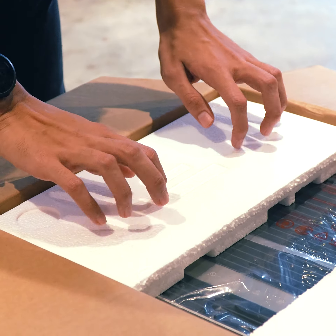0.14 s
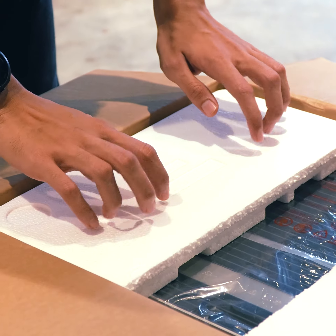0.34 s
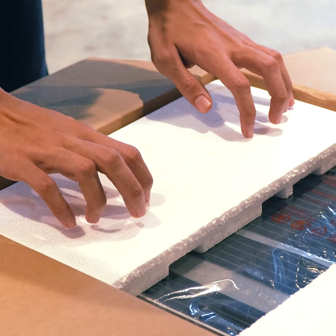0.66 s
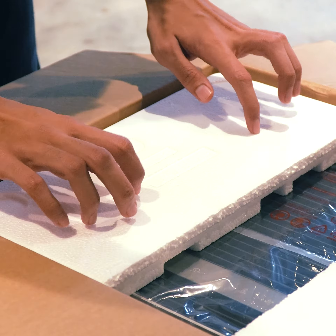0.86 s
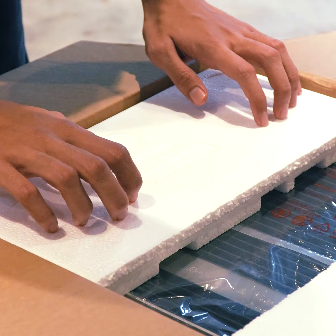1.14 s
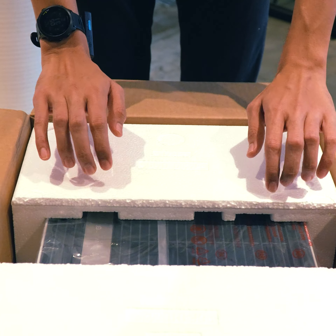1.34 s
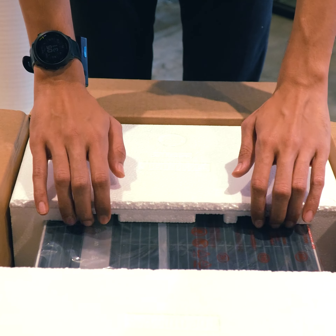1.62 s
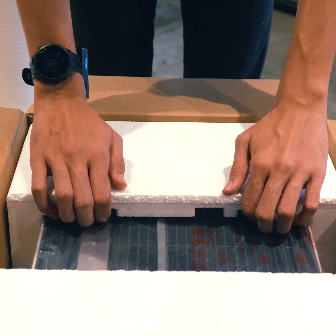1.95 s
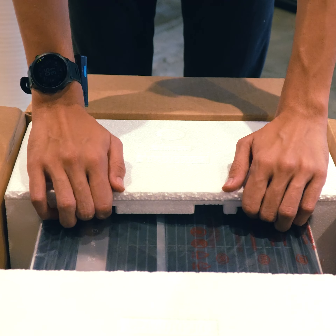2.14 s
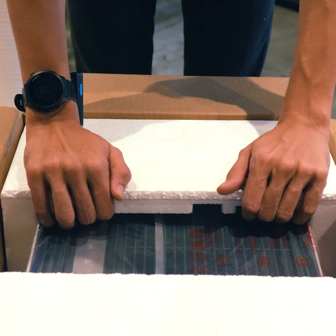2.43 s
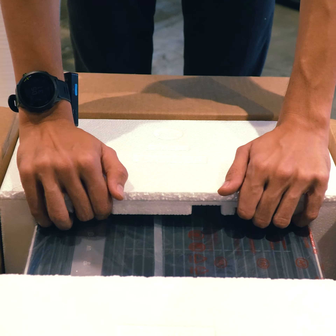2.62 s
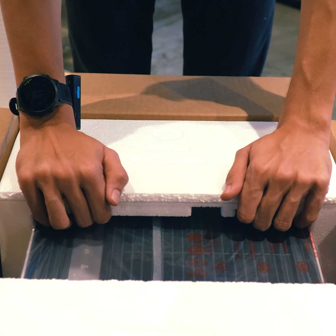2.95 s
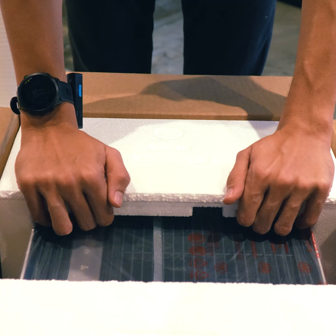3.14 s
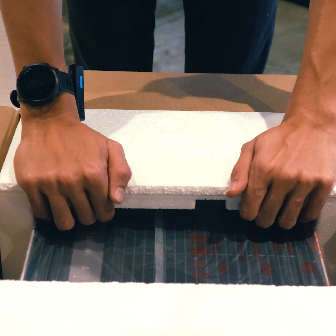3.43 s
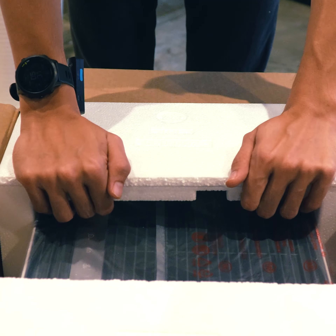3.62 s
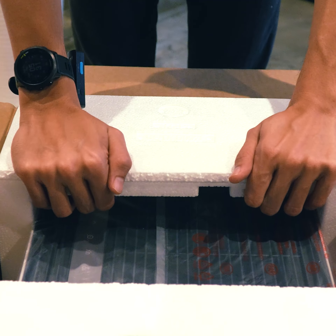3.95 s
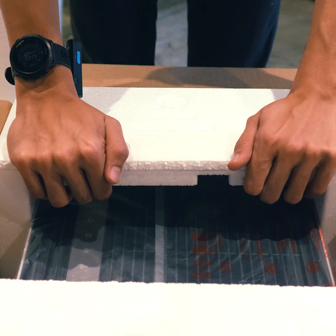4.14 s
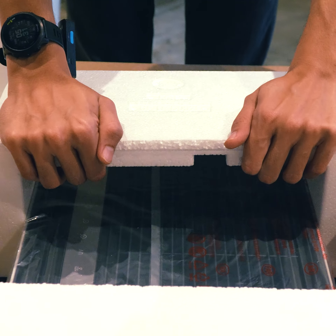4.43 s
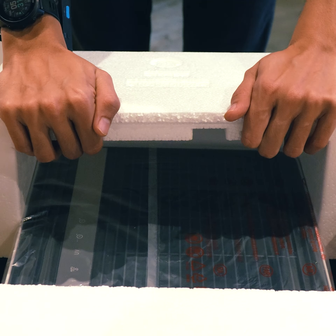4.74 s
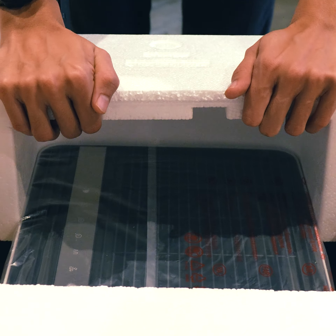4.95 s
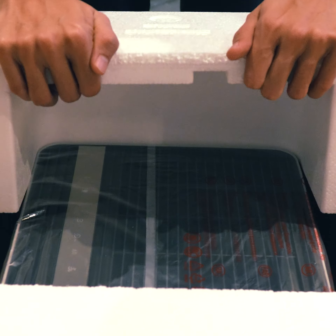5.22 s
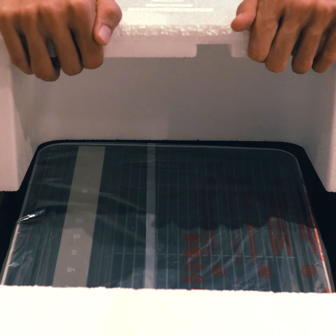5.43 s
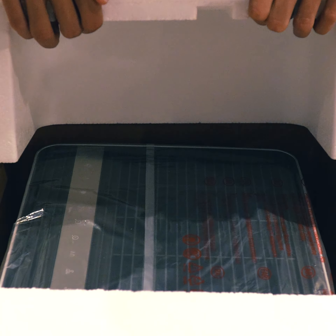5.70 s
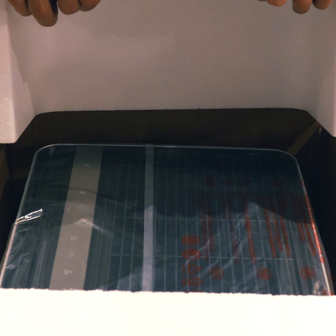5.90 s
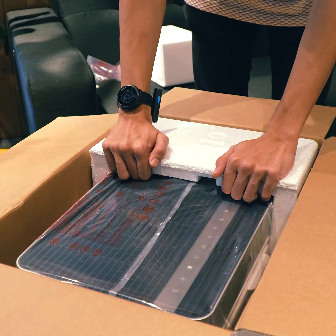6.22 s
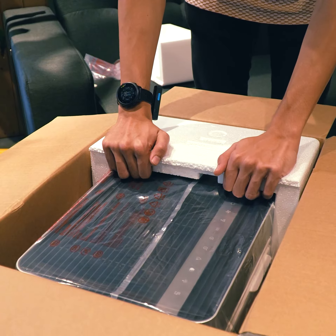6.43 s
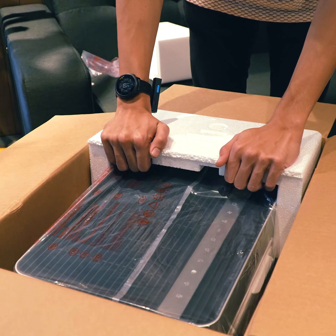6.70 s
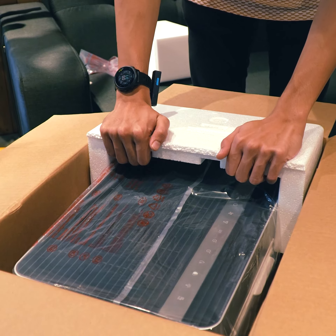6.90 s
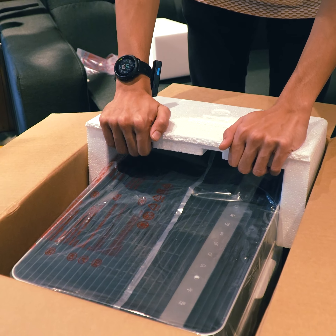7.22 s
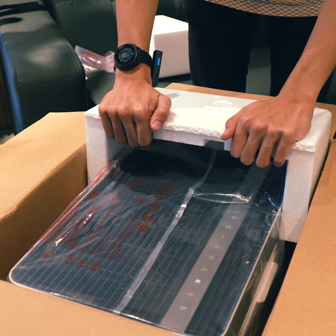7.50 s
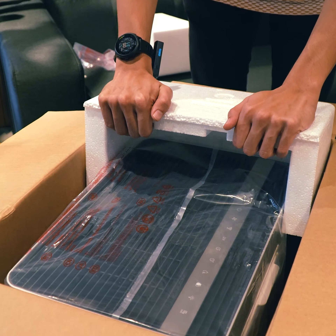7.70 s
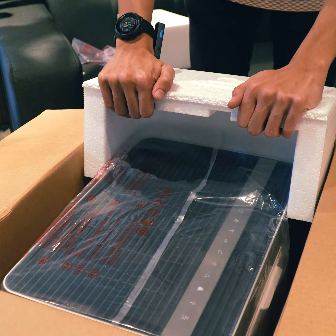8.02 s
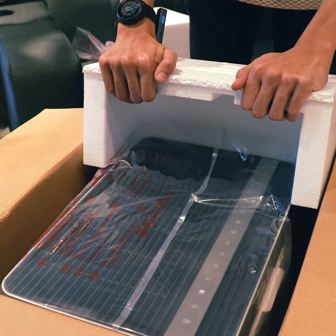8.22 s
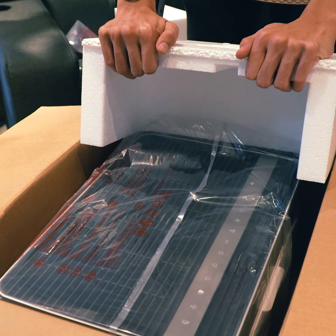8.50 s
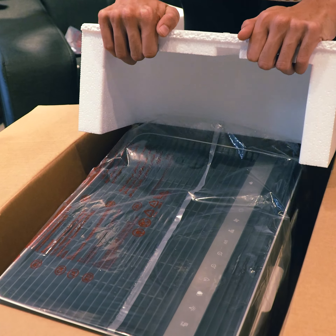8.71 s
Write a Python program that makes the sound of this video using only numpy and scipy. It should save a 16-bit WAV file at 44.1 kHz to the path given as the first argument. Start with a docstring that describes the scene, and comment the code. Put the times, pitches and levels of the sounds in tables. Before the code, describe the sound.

Close, dry indoor sound with a short room echo over very faint air. From 0.1 to 1.1 s, fingertips drum on a polystyrene slab in uneven clusters: low hollow thuds, light nail ticks, tiny brushes. Around 1.2-1.6 s come soft dull knocks, then skin rubs brightly over the foam until about 2.5 s, with creaks, sharp bead ticks and a stronger cluster of bumps near 2.3 s. Crackles patter at 2.8-2.9 s; creaks tighten at 3.1-3.3 s into short jerky scrapes. From 4.1 to 6.1 s one long raspy hiss slides up cardboard, growing hollower from about 4.4 s, with light plastic rustle and a short groan near 4.9 s. At 6.3-6.7 s come small creaks and knocks, then a second gritty, juddering pull to the end, with a bump at 7.5, a sharp tick at 7.8, a fresh surge at 8 and thin high squeaks around 8.6.

```python
"""Foam insert handled in a box

Fingers drum on a polystyrene insert, slide over its edge and grip it, close by and indoors: damped swings,
modal rings and bursts of noise. The foam creaks, then scrapes up its cardboard box in jerks and long pulls,
and a second insert follows: random bead slips, filtered into registers. Knocks and soft presses bump dully
as damped swings with low noise; beads and plastic wrap crackle as short bursts and clumped impulses."""
import sys
import numpy as np
from scipy import signal
from scipy.fft import rfft, irfft, next_fast_len
from scipy.io import wavfile
from scipy.ndimage import uniform_filter1d

SR = 44100
rng = np.random.default_rng(int(sys.argv[2]) if len(sys.argv) > 2 else 0)


def to_wav(s):
    """Save 16-bit WAV."""
    ch = np.atleast_2d(s).T  # columns
    pcm = np.round(np.clip(ch, -1, 1) * 32767)  # PCM
    wavfile.write(sys.argv[1], SR, pcm.astype(np.int16))


N = 390726
TIME = np.arange(N) / SR

# Levels in event tables are relative; the sources trim them.
# Finger taps. Each row: time in seconds, thud in dB, nominal thud pitch in Hz, nail tick in dB,
# slab ring in dB re the thud column.
FINGER_TAPS = [(0.121, -8, 286, -32, -15.5), (0.124, -4.5, 167, -21.5, -9), (0.164, -20, 178, -44, -27),
               (0.295, -9.5, 160, -22, -26), (0.306, -3, 181, -33, -14), (0.346, -14, 181, -30.5, -16),
               (0.465, -10, 248, -22.5, -3), (0.469, -8, 220, -34, -14), (0.534, -9.5, 168, -26, -18),
               (0.545, -9.5, 206, -32, -17), (0.628, -9, 198, -27, -18), (0.633, -10, 141, -26, -6.5),
               (0.642, -10.5, 242, -29.5, 0.5), (0.767, -5, 245, -34.5, -12.5), (0.842, -16, 207, -39, -24),
               (0.855, -11.5, 188, -37, -15.5), (0.899, -12.5, 183, -31, -18),
               (0.976, -2.5, 234, -26.5, -10), (1.002, -10.5, 284, -29, -8.5), (1.004, -3, 204, -32, -12),
               (1.093, -10, 207, -31.5, -19.5)]
# Dull knocks of the insert on the box and soft finger presses. Each row: time in seconds, level in dB,
# pitch in Hz.
KNOCKS_AND_PRESSES = [(1.224, -16, 91), (1.447, -9, 154), (1.529, -8.5, 117), (1.637, -20, 88),
                      (1.954, -18.5, 121), (2.112, -25, 109), (2.21, -25, 110), (2.3, -5.5, 159),
                      (2.323, -10, 237), (2.406, -11, 240), (2.394, -9, 130), (2.424, -12, 113),
                      (2.599, -35, 120), (3.002, -28.5, 99), (3.68, -32, 70), (3.87, -35.5, 70),
                      (5.61, -36, 80), (6.063, -26.5, 72.7), (6.38, -26, 170), (6.43, -28, 170),
                      (6.508, -18, 100), (6.534, -11.5, 158), (6.6, -23, 130), (6.669, -18, 136),
                      (7.019, -30, 110), (7.081, -24.5, 114), (7.135, -32, 150), (7.253, -28, 161),
                      (7.42, -19, 133), (7.5, -10, 203), (7.766, -19.5, 159), (8.57, -35, 69.5)]
# Single slips of gripped foam. Each row: time in seconds, slab body in dB, snap in dB.
FOAM_SLIPS = [(1.95, -21, -27), (2.042, -20, -19), (2.06, -20, -22), (2.339, -16, -19), (2.372, -12, -34),
              (2.388, -11, -24), (2.403, -8.5, -25), (2.537, -20, -28), (2.601, -22, -25),
              (2.985, -25, -25), (3.145, -24, -27), (3.16, -12, -26.5), (3.173, -22, -38),
              (3.185, -23, -35), (3.201, -14.5, -31), (3.222, -12, -20), (3.239, -8, -37),
              (3.28, -12, -22.5), (3.325, -12.5, -19), (4.075, -30, -28), (4.875, -25, -30),
              (4.915, -28, -38), (6.287, -22.5, -31), (6.314, -27, -39), (6.351, -29, -30),
              (6.373, -24, -24)]
# Sharp ticks of beads and plastic wrap. Each row: time in seconds, level in dB.
BEAD_TICKS = [(0.2287, -11.5), (0.42, -20), (1.7384, -25), (2.009, -7), (2.186, -8), (2.513, -8.5),
              (2.7674, -14), (2.7831, -15.5), (2.809, -12), (2.846, -9.5), (2.861, -8), (2.886, -9),
              (2.9038, -11), (6.282, -21.5), (7.833, -6.5)]
# Skin strokes on foam. Each row: start in seconds, length before release in seconds, rub in dB,
# slab body in dB re the rub column.
SKIN_RUBS = [(0.148, 0.1, -34, -6.5), (0.344, 0.039, -27, -10), (0.53, 0.042, -32.5, 0),
             (0.649, 0.07, -41.5, -3), (0.783, 0.015, -42, -8), (0.835, 0.03, -33, -21),
             (0.884, 0.02, -32.5, 6), (1.003, 0.07, -50, 7), (1.09, 0.042, -35.5, -17),
             (1.14, 0.06, -64, -2), (1.275, 0.04, -59, -6), (1.539, 0.04, -38.5, -8),
             (1.565, 0.055, -25.5, -1.5), (1.636, 0.028, -24, -8), (1.647, 0.029, -21.5, -7),
             (1.679, 0.069, -20.5, -2.5), (1.751, 0.095, -27, -8.5), (1.843, 0.058, -26, 2.5),
             (1.88, 0.049, -18, -16), (1.934, 0.13, -22.5, -2), (2.064, 0.22, -24, -11.5),
             (2.269, 0.15, -27, -3), (2.414, 0.052, -28, -10), (2.479, 0.044, -28.5, -2),
             (2.545, 0.096, -29, -19), (2.65, 0.1, -36, -13), (2.769, 0.068, -36, 1),
             (2.851, 0.064, -35.5, -12), (2.95, 0.18, -42, -4.5), (3.142, 0.16, -41, 7),
             (3.311, 0.43, -38.5, 11)]
RUB_ATTACK_S, RUB_RELEASE_S, RUB_SAG_DB_PER_S = 0.031, 0.014, 6.5
# Narrow foam sounds: a faint whisper, a short groan and high squeaks.
# Each row: start in seconds, length in seconds, centre in Hz, width in Hz, level in dB.
NARROW_SOUNDS = [(0.007, 0.21, 4080, 400, -48.5), (4.867, 0.083, 930, 350, -24),
                 (8.534, 0.1, 10800, 500, -29), (8.59, 0.046, 11000, 900, -24),
                 (8.632, 0.037, 11000, 2400, -16.5)]
# Runs of small slips in strained foam. Each row: start in seconds, length before release in seconds,
# level in dB.
FOAM_GROANS = [(1.87, 0.11, -41), (1.94, 0.068, -34.5), (2.26, 0.18, -33.5), (2.48, 0.053, -52),
               (2.58, 0.03, -31.5), (2.97, 0.095, -38.5), (3.07, 0.11, -34.5), (3.14, 0.22, -33.5),
               (3.33, 0.42, -39)]
GROAN_ATTACK_S, GROAN_RELEASE_S, GROAN_SAG_DB_PER_S = 0.032, 0.012, 14
# Jerks up the box wall. Each row: start in seconds, length before release in seconds, hiss in dB.
WALL_JERKS = [(3.315, 0.028, -24), (3.385, 0.087, -22), (3.79, 0.046, -28.5), (3.872, 0.052, -26.5),
              (3.978, 0.045, -23), (6.352, 0.048, -38.5), (6.385, 0.084, -50), (6.44, 0.062, -28.5)]
JERK_ATTACK_S, JERK_RELEASE_S, JERK_RASP_DB = 0.025, 0.0057, 2.5  # rasp re hiss
# Long pulls: a short heave, then one pull per insert. Each row: time in seconds, hiss in dB,
# rasp of a tight fit in dB re hiss.
HEAVE_CURVE = [(3.17, -44, 3), (3.28, -33.5, 7), (3.308, -38, 5), (3.348, -24.5, 5), (3.676, -25, 0.5),
               (3.79, -36.5, -3)]
FIRST_PULL_CURVE = [(4.08, -30, -4), (4.096, -31.5, 2), (4.19, -21, 1), (4.228, -21.5, 1),
                    (4.372, -21.5, -3.5), (4.426, -25, -5), (5.16, -22.5, -5.5), (5.424, -24.5, -2),
                    (5.722, -26.5, 9), (5.74, -22.5, 3.5), (5.948, -24.5, 2.5), (6.06, -18.5, -2)]
SECOND_PULL_CURVE = [(6.51, -38, 4), (6.55, -20, 0), (6.86, -19, 0.5), (7.22, -25.5, 3), (7.73, -25.5, -4),
                     (7.92, -27, 0), (7.96, -19.5, -5.5), (8.07, -23.5, -3), (8.44, -22, -4),
                     (8.53, -27.5, 3.5), (8.63, -24, 1.5), (8.72, -28, 5), (8.86, -26, 2)]
PULL_CURVES = [HEAVE_CURVE, FIRST_PULL_CURVE, SECOND_PULL_CURVE]
# Momentary catches of the sliding foam. Each row: time in seconds, dip in dB.
SLIDE_CATCHES = [(4.408, -4), (4.6, -2.5), (7.07, -6.5), (7.2, -1.5)]
CATCH_S = 0.018
USUAL_HISS_DB = -23.5
BODY_FOLLOW = 0.39  # exponent: slab body, cavity and drag follow the effort
FIZZ_LOSS_DB_PER_DB = 0.21  # fizz lost per dB of rasp over hiss
# The two inserts. Each row: gripped at seconds, cavity starts to open at seconds, fully open at seconds,
# slab body in dB, closed cavity in dB, open cavity in dB.
INSERT_STATES = [(3.0, 4.4, 5.42, -34, -35.5, -24.5), (6.307, 7.95, 8.4, -35.5, -37.5, -25.5)]
# Plastic wrap rustles. Each row: start in seconds, length before release in seconds, level in dB.
WRAP_RUSTLES = [(4.29, 0.09, -32), (4.85, 0.59, -37), (5.96, 0.1, -28), (7.39, 0.34, -42),
                (7.9, 0.62, -36.5)]
RUSTLE_ATTACK_S, RUSTLE_RELEASE_S = 0.054, 0.012

# Spectra of skin on foam, foam on card, flexing box, box-wall drag, air, nail, foam snap, strained slab.
# Each row: frequency in Hz, relative gain in dB.
SKIN_SPECTRUM = [(210, -46), (350, 12), (404, 2.5), (611, -14.5), (955, -2), (1450, -5), (1720, -16.5),
                 (2530, -14.5), (3010, -8), (3760, -15), (4140, -4), (4700, -6), (5520, -6), (9640, -11.5),
                 (15800, -28)]
CARD_SPECTRUM = [(300, -41), (520, -26), (640, -25.5), (800, -16.5), (1050, -11), (1350, -11), (1560, -7),
                 (1950, -7), (2500, -1.5), (3200, 3), (4200, -1.5), (5200, -1.5), (8500, -18), (11000, -24),
                 (15800, -37)]
BOX_SPECTRUM = [(25, -59), (45, -8), (80, 4), (115, 5), (150, -1.5), (185, -3.5), (235, -7.5), (290, -18.5),
                (420, -39), (800, -86)]
DRAG_SPECTRUM = [(25, -28), (50, -1.5), (85, -2), (160, -6), (250, -4), (420, -2), (600, -7), (900, -24.5)]
AIR_SPECTRUM = [(25, -29), (60, -2.5), (220, -3), (380, -4.5), (510, -11), (930, -2), (1270, -8),
                (1830, -15.5), (3500, -22), (6000, -25), (10000, -39), (15000, -48)]
NAIL_SPECTRUM = [(300, -9), (700, -3), (1080, 13.5), (1450, 8), (1850, 5.5), (2700, 6), (4000, 1),
                 (6300, 5), (9500, -5), (12500, -15), (16000, -20)]
SNAP_SPECTRUM = [(400, -6), (1100, -15), (2000, 0), (3200, 7.5), (6000, -1), (10000, -1), (16000, -26)]
STRAIN_SPECTRUM = [(130, -19), (200, 3), (290, -2.5), (420, 8), (550, 1.5), (690, 6.5), (900, -22),
                   (1400, -33)]
AIR_DB = -52
# Modes of the tapped slab and of the gripped slab, scattered per contact.
# Each row: nominal frequency in Hz, nominal level in dB, t60 in seconds.
SLAB_MODES = [(227.5, -9.5, 0.3), (160, -2.5, 0.097), (293.6, -6, 0.12), (385, -3.5, 0.047),
              (500, -11.5, 0.089), (692, -26, 0.18), (914, -20.5, 0.18), (1090, -20.5, 0.17),
              (1400, -23, 0.11)]
GRIP_MODES = [(228, -8.5, 0.05), (305, -3, 0.081), (446, -6.5, 0.071), (593, -2, 0.048), (740, 4, 0.029),
              (850, 2.5, 0.021), (1090, 4.5, 0.024), (1250, 3, 0.018), (1600, -5, 0.017)]
EDGE_HZ = 15850


def amp(db):
    """Decibels to gain."""
    return 10 ** (np.asarray(db) / 20)


def evened(x):
    """Scales to unit rms."""
    return x / np.sqrt(np.mean(x ** 2) + 1e-20)


def steadied(x, size=2600):
    """Holds the running rms of a texture near one and keeps its fine grain."""
    return x / np.sqrt(abs(uniform_filter1d(x ** 2, size)) + 1e-12)


def read(points, hz):
    """Interpolates a curve on a log-frequency axis."""
    point_hz, value = np.transpose(points)
    return np.interp(np.log(hz + 1), np.log(point_hz + 1), value)


def add(mix, s, sound):
    """Adds a sound in place at time s."""
    part = mix[max(round(s * SR), 0):][:len(sound)]
    part += sound[:len(part)]


def colour(x, points, size=4096):
    """Minimum-phase filter with the given spectrum."""
    hz = abs(np.fft.fftfreq(size, 1 / SR))
    log_gain = np.log(amp(np.maximum(read(points, hz), -100)))
    response = np.exp(np.conj(signal.hilbert(log_gain)))
    impulse = np.fft.ifft(response).real[:size // 2]
    return signal.oaconvolve(x, impulse)[:len(x)]


def band(x, lo_hz, hi_hz, order=14):
    """One register of a sound, at unit rms."""
    size = next_fast_len(len(x))
    hz = np.fft.rfftfreq(size, 1 / SR) + 1
    gain = ((1 + (lo_hz / hz) ** order) * (1 + (hz / hi_hz) ** order)) ** -.5
    return evened(irfft(rfft(x, size) * gain, size)[:len(x)])


def wander(hz):
    """Low-passed random motion at unit rms, with its cutoff at hz."""
    lowpass = signal.butter(2, hz, fs=SR, output="sos")
    return evened(signal.sosfilt(lowpass, rng.standard_normal(N)))


def strokes(rows, attack_s, release_s, sag_db_per_s=0):
    """Gain curve of (s, length, dB) strokes: each swells, holds with any sag and dies away."""
    power, t = np.zeros(N), TIME[:SR]
    for s, length, db in rows:
        attack = np.sin(np.pi / 2 * np.minimum(t / attack_s, 1)) ** 2
        release = np.exp(-np.maximum(t - length, 0) / release_s)
        add(power, s, (amp(db - sag_db_per_s * t) * attack * release) ** 2)
    return np.sqrt(power)


def level(pulls, axis=0, size=400):
    """Smoothed gain curve of the pulls; axis 1 adds the column given relative to the main level."""
    gain = np.zeros(N)
    for rows in pulls:
        s, db, *registers = np.transpose(rows)
        if axis:
            db = db + registers[axis - 1]
        gain += amp(np.interp(TIME, s, db, left=-np.inf, right=-np.inf))
    return abs(uniform_filter1d(gain, size))


def slips(per_s, spread_db, clump_db, clump_hz):
    """Foam beads catch and let go: random impulses of uneven size, stronger in clumps."""
    size = amp(spread_db * np.minimum(rng.exponential(1, N), 4))
    signed = size * rng.choice([-1, 1], N)
    happens = rng.random(N) < per_s / SR
    return signed * happens * amp(clump_db * wander(clump_hz))


def shifting(x, depth_db, frames, bins):
    """The contact moves over the foam, so its colour drifts in time-frequency patches."""
    z = signal.stft(x, nperseg=512, noverlap=384)[2]
    field = rng.standard_normal(z.shape)
    for _ in range(2):
        field = uniform_filter1d(field, max(round(frames), 1), axis=1)
        field = uniform_filter1d(field, max(round(bins), 1), axis=0)
    return signal.istft(z * amp(depth_db * evened(field)), nperseg=512, noverlap=384)[1][:N]


def ring(modes, scatter):
    """A struck body: decaying modes, shifted a little and weighted anew at each contact."""
    t, out = TIME[:SR // 3], 0
    for hz, db, t60 in modes:
        shift = rng.uniform(-1, 1)
        weight = rng.choice([-1, 1]) * rng.uniform(0.6, 1.3)
        tone = np.sin(2 * np.pi * hz * (1 + scatter * shift) * t)
        out = out + weight * amp(db - 60 * t / t60) * tone
    return out


def crunch(points, t60, rise=0.000086, size=3000):
    """A few beads crushed at once: a decaying noise burst with a peak of one."""
    t = TIME[:size]
    envelope = amp(-60 * t / t60) * (1 - np.exp(-t / rise)) ** 2
    burst = colour(rng.standard_normal(size) * envelope, points)
    return burst / abs(burst).max()


def push(hz, delay, cycles):
    """Heavily damped swing of a panel under a blow: a sine in a Gaussian centred on the delay."""
    turns = (TIME[:SR // 10] - delay) * hz
    return -np.sin(2 * np.pi * turns) * np.exp(-(turns / cycles) ** 2)


def room(x, wet_db, low_t60, high_t60):
    """Sparse random reflections with separate decay times for lows and highs."""
    echoes = rng.choice([-1., 1.], SR) * (rng.random(SR) < 0.07) * (TIME[:SR] > 0.004)
    hz, t, z = signal.stft(echoes, SR, nperseg=256)
    t60 = read([(500, low_t60), (10000, high_t60)], hz)[:, None]
    tail = signal.istft(z * amp(-60 * t / t60), SR, nperseg=256)[1]
    return x + amp(wet_db) * signal.fftconvolve(x, tail / np.linalg.norm(tail))[:N]


def air():
    """Steady faint background: filtered noise."""
    return amp(AIR_DB) * evened(colour(rng.standard_normal(N), AIR_SPECTRUM))


def box(knock_db=-5, flex_db=-15, load_s=0.038, relax_s=0.041):
    """Knocks and soft presses swing the box; low noise swells up to each and dies away after it."""
    swings, flex_power = np.zeros(N), np.zeros(N)
    t = TIME[:SR] - 0.5
    strain = np.exp(np.minimum(t / load_s, -t / relax_s))
    for s, db, hz in KNOCKS_AND_PRESSES:
        add(swings, s - 0.012, amp(db + knock_db) * push(hz, delay=0.017, cycles=1.1))
        add(flex_power, s - 0.5, (amp(db + flex_db) * strain) ** 2)
    rumble = steadied(colour(rng.standard_normal(N), BOX_SPECTRUM))
    return swings + np.sqrt(flex_power) * rumble


def wrap():
    """Plastic film crinkles as the foam passes: dense clumped impulses, high-banded."""
    crinkle = colour(slips(per_s=6400, spread_db=1.0, clump_db=4.0, clump_hz=90), SNAP_SPECTRUM)
    swells = strokes(WRAP_RUSTLES, RUSTLE_ATTACK_S, RUSTLE_RELEASE_S)
    return swells * steadied(band(crinkle, 6500, 16000))


def narrow_sounds():
    """A faint whisper, a short groan and high squeaks of foam: bands of noise that swell and fade."""
    out = np.zeros(N)
    for s, length, hz, width_hz, db in NARROW_SOUNDS:
        swell = np.hanning(int(length * SR))
        noise = rng.standard_normal(len(swell))
        narrow = band(noise, hz - width_hz / 2, hz + width_hz / 2, order=50)
        add(out, s, amp(db) * swell * narrow)
    return out


def taps(lead=0.00331, delay=0.00815, thud_db=-1, skin_db=5, skin_hz=440, tick_db=11):
    """Each fingertip pushes the slab, dents its skin, crushes a few beads and leaves a low ring."""
    out = np.zeros(N)
    for s, db, hz, nail_db, ring_db in FINGER_TAPS:
        dent_hz = skin_hz * rng.uniform(0.94, 0.97)
        add(out, s - lead, amp(db + thud_db) * push(hz, delay, cycles=0.76))
        add(out, s - lead, amp(nail_db + skin_db) * push(dent_hz, delay, cycles=1.0))
        add(out, s + lead, amp(db + ring_db) * ring(SLAB_MODES, scatter=0.078))
        add(out, s, amp(nail_db + tick_db) * crunch(NAIL_SPECTRUM, t60=0.026, rise=0.003))
    return out


def graze(graze_db=-9, touch_s=0.0075, lift_s=0.0039):
    """Each fingertip brushes the beads as it lands: slips that swell to the tap and die away."""
    power, t = np.zeros(N), TIME[:SR // 5] - 0.1
    touch = np.exp(np.minimum(t / touch_s, -t / lift_s))
    for s, _, _, nail_db, _ in FINGER_TAPS:
        add(power, s - 0.1, (amp(nail_db + graze_db) * touch) ** 2)
    drive = slips(per_s=5100, spread_db=8.5, clump_db=3.5, clump_hz=100)
    return np.sqrt(power) * steadied(colour(drive, SKIN_SPECTRUM))


def creaks(body_db=-11.0, snap_db=6.0, tick_db=-5.0):
    """Single large slips ring the slab and snap; beads and plastic wrap tick."""
    out = np.zeros(N)
    for s, db, high_db in FOAM_SLIPS:
        add(out, s + 0.00264, amp(db + body_db) * ring(GRIP_MODES, scatter=0.11))
        add(out, s + 0.0051, amp(high_db + snap_db) * crunch(SNAP_SPECTRUM, t60=0.017))
    for s, db in BEAD_TICKS:
        add(out, s, amp(db + tick_db) * crunch(SNAP_SPECTRUM, t60=0.02, rise=0.00011))
    return out


def groan():
    """Strained foam creeps in quick small slips, coloured by the slab's low voice."""
    drive = slips(per_s=900, spread_db=2, clump_db=1.2, clump_hz=70)
    swells = strokes(FOAM_GROANS, GROAN_ATTACK_S, GROAN_RELEASE_S, GROAN_SAG_DB_PER_S)
    return swells * steadied(colour(drive, STRAIN_SPECTRUM))


def fingers(rub_db=-1, body_db=-1.9, crackle_db=-5, uneven_db=1.55, uneven_hz=35):
    """Skin drags over the beads: a bright rub with sparse crackles above the slab's hollow note."""
    drive = slips(per_s=6000, spread_db=0.5, clump_db=1.0, clump_hz=108)
    grain = colour(shifting(drive, depth_db=2.5, frames=8, bins=4), SKIN_SPECTRUM)
    sparse = slips(per_s=330, spread_db=0.5, clump_db=2.0, clump_hz=30)
    crackle = evened(colour(sparse, SNAP_SPECTRUM))
    shape = RUB_ATTACK_S, RUB_RELEASE_S, RUB_SAG_DB_PER_S
    rub_rows = [(s, length, db + rub_db) for s, length, db, _ in SKIN_RUBS]
    body_rows = [(s, length, db + slab_db + body_db) for s, length, db, slab_db in SKIN_RUBS]
    bright = steadied(band(grain, 1450, 17000)) + amp(crackle_db) * crackle
    hollow = steadied(band(grain, 720, 1300, order=12))
    rubbing = strokes(rub_rows, *shape) * bright + strokes(body_rows, *shape) * hollow
    return amp(uneven_db * wander(uneven_hz)) * rubbing


def travel(judder_db=1.24, judder_hz=14):
    """Strength of hiss and rasp as the inserts move: pulls that judder and catch, and short jerks."""
    dips_db = sum(db * np.exp(-((TIME - s) / CATCH_S) ** 2) for s, db in SLIDE_CATCHES)
    uneven = amp(dips_db + judder_db * wander(judder_hz))
    jerk = strokes(WALL_JERKS, JERK_ATTACK_S, JERK_RELEASE_S)
    hiss = np.hypot(uneven * level(PULL_CURVES), jerk)
    rasp = np.hypot(uneven * level(PULL_CURVES, axis=1), amp(JERK_RASP_DB) * jerk)
    return hiss, rasp


def hollows():
    """Strength of the slab's body and of the cavity that opens under each rising insert."""
    body, cavity = np.zeros(N), np.zeros(N)
    for gripped, opens, opened, body_db, closed_db, open_db in INSERT_STATES:
        opening_db = np.interp(TIME, [opens, opened], [closed_db, open_db])
        body = np.where(TIME > gripped, amp(body_db), body)
        cavity = np.where(TIME > gripped, amp(opening_db), cavity)
    return body, cavity


def scrape(rasp_db=-1.2, hiss_db=-1.93, fizz_db=-9, drag_db=-49):
    """Foam rasps along cardboard; the cavity under the rising insert sounds as it opens."""
    drive = slips(per_s=15000, spread_db=2.0, clump_db=0.12, clump_hz=91.5)
    grain = colour(shifting(drive, depth_db=2.0, frames=15.4, bins=2), CARD_SPECTRUM)
    speed, bite = travel()
    slab, hollow = hollows()
    effort = (np.sqrt(speed * bite) / amp(USUAL_HISS_DB)) ** BODY_FOLLOW
    looseness = ((speed + 1e-9) / (bite + 1e-9)) ** FIZZ_LOSS_DB_PER_DB
    rasp = amp(rasp_db) * bite * steadied(band(grain, 2535, 3900, order=30))
    body = slab * effort * steadied(band(grain, 585, 1440, order=24))
    cavity = hollow * effort * steadied(band(grain, 1490, 2440, order=30))
    hiss = amp(hiss_db) * speed * steadied(band(grain, 4010, 7200, order=30))
    fizz = amp(fizz_db) * speed * looseness * steadied(band(grain, 7700, 15400, order=24))
    # faint low rush in the box walls while the foam moves
    drag = amp(drag_db) * effort * evened(colour(drive, DRAG_SPECTRUM))
    return rasp + body + cavity + hiss + fizz + drag


def scene():
    """Hands on the foam and sounds of the box, each with their own echo, over quiet air."""
    background = air()
    carton = room(box() + wrap() + narrow_sounds() + scrape(), wet_db=-18, low_t60=0.19, high_t60=0.41)
    handling = taps() + graze() + creaks() + groan() + fingers()
    hands = room(handling, wet_db=-16, low_t60=0.3, high_t60=0.14)
    return (hands + carton + background)[None]


def record(dry, ceiling=0.42, order=6):
    """Rounds off peaks at a soft ceiling, then low-passes at EDGE_HZ."""
    held = dry / (1 + abs(dry / ceiling) ** order) ** (1 / order)
    lowpass = signal.firwin(511, EDGE_HZ, window=("kaiser", 9), fs=SR)
    return signal.oaconvolve(held, lowpass[None], "same")


dry = scene()
out = record(dry)
to_wav(out)
```